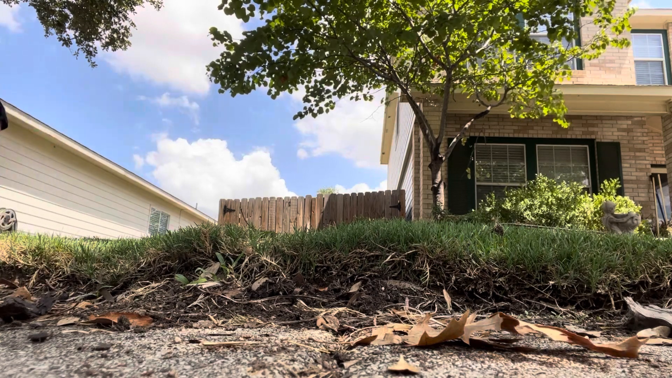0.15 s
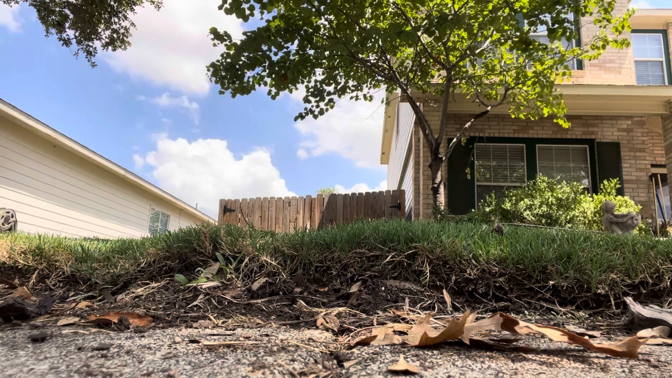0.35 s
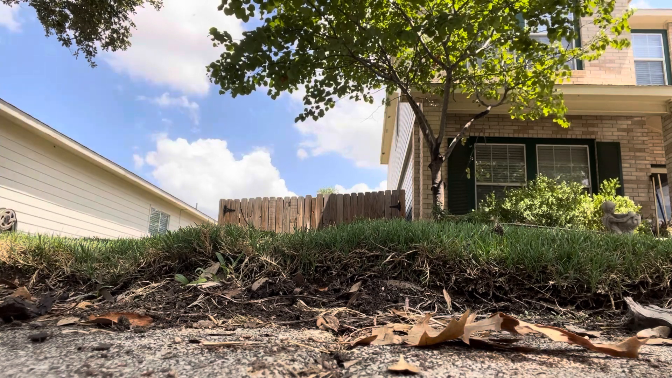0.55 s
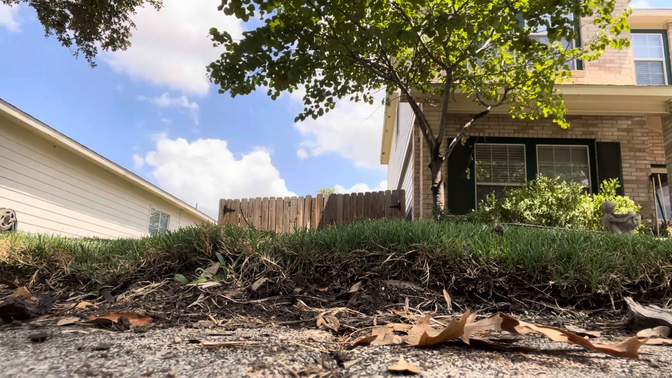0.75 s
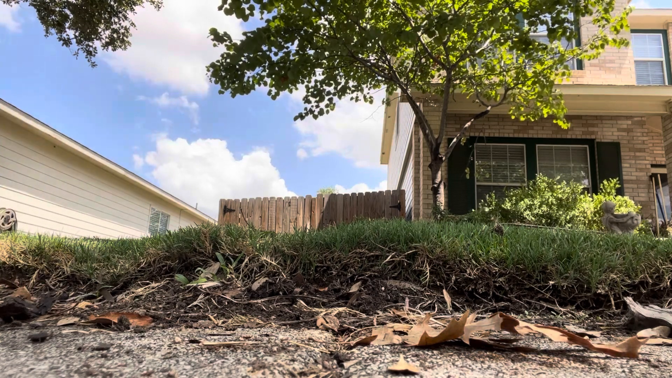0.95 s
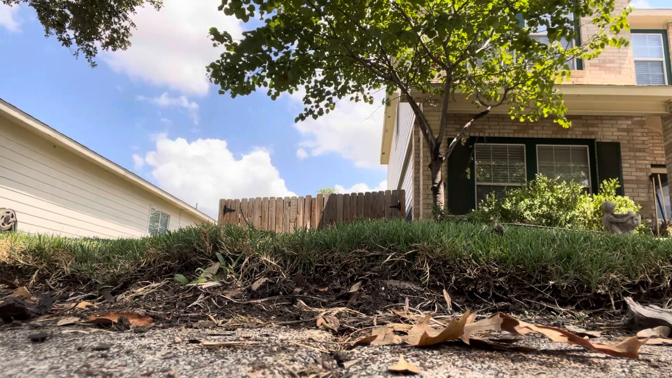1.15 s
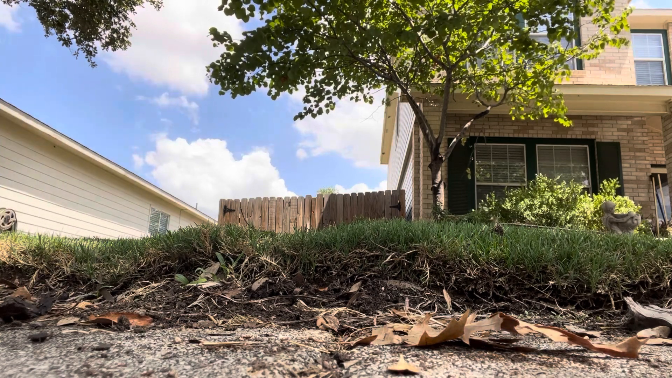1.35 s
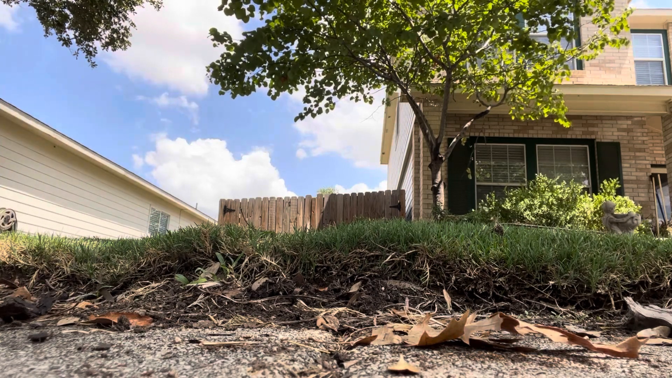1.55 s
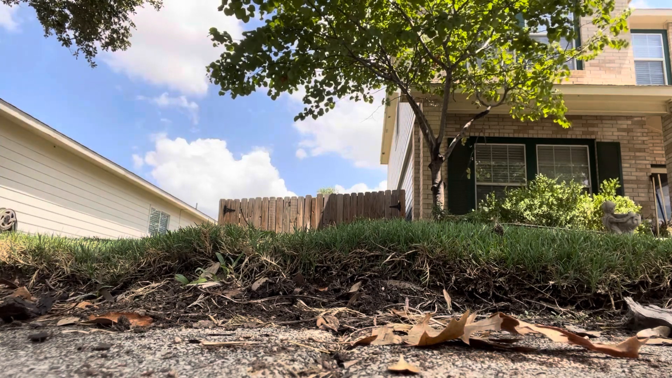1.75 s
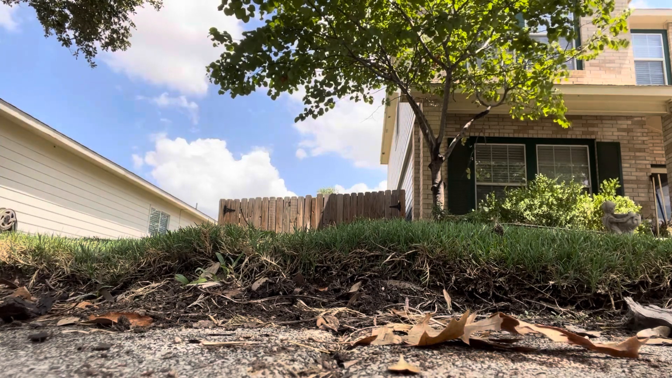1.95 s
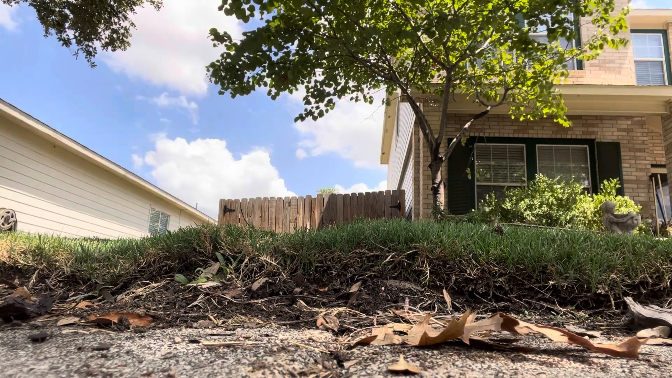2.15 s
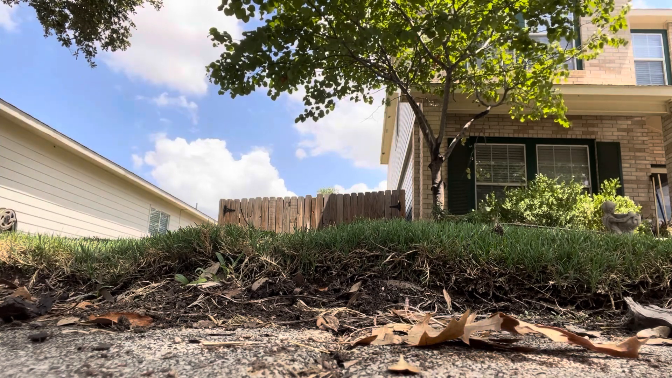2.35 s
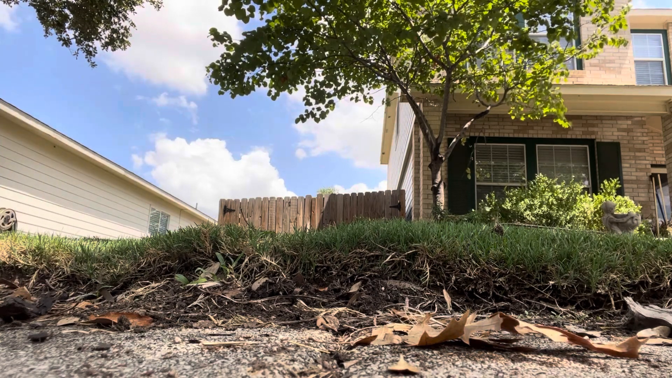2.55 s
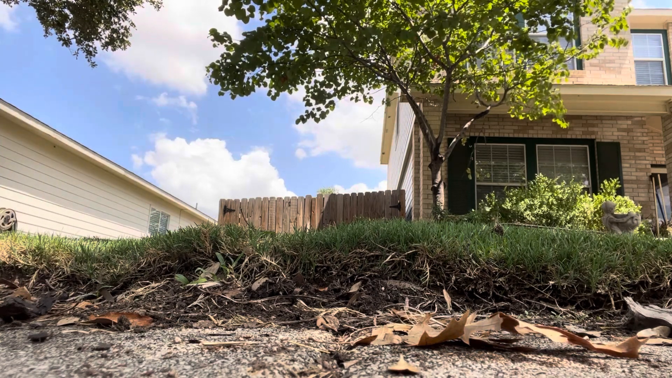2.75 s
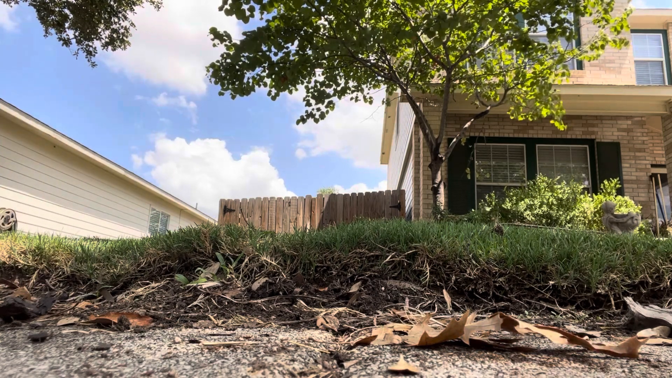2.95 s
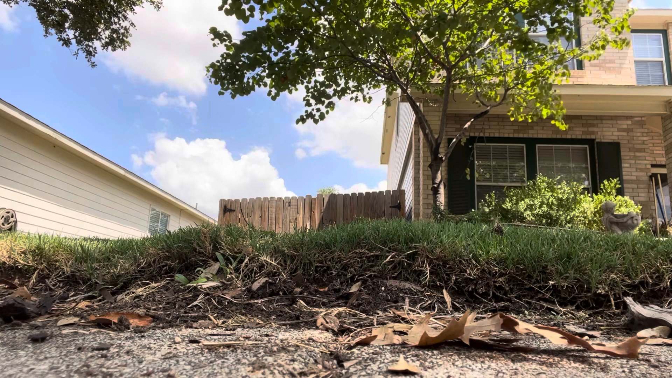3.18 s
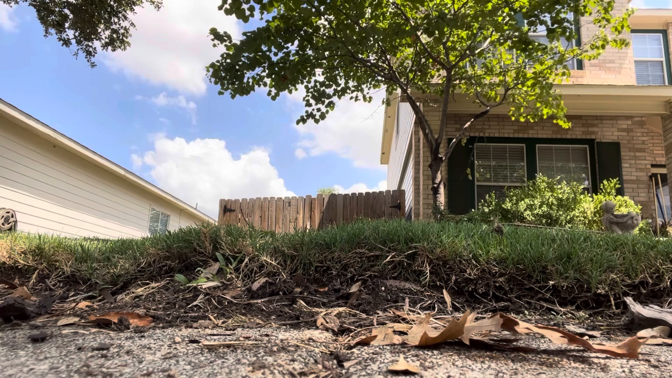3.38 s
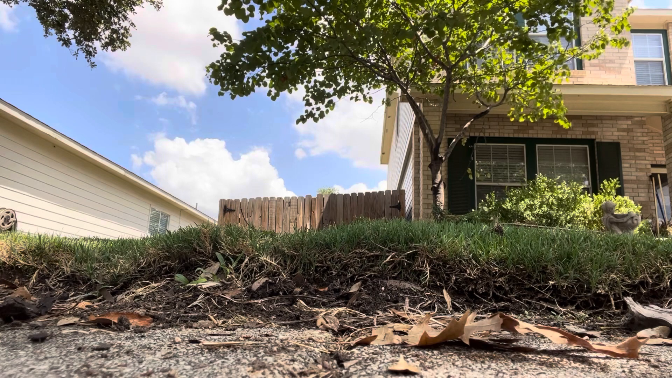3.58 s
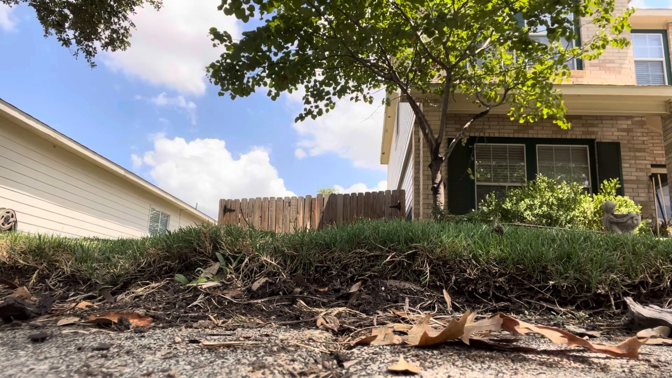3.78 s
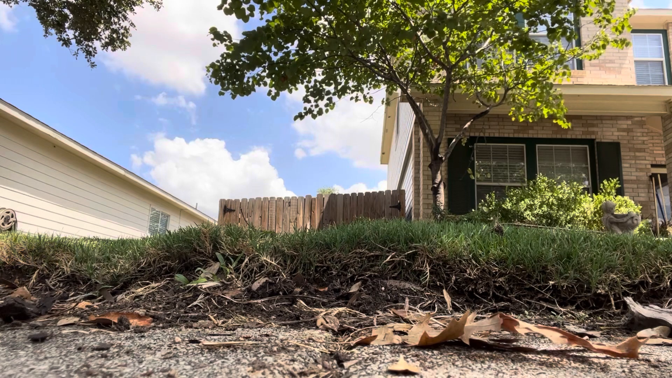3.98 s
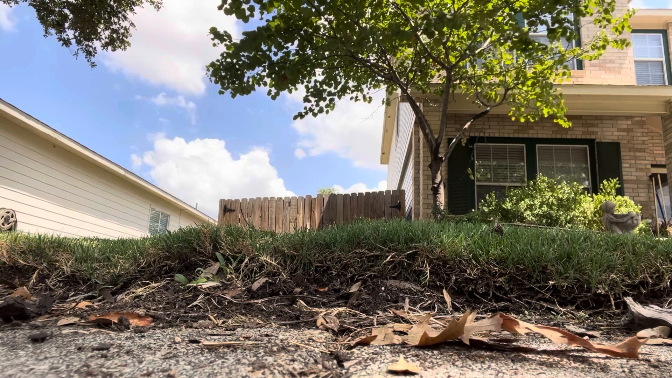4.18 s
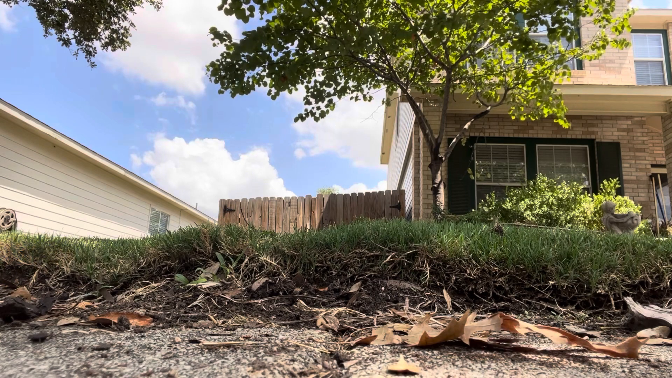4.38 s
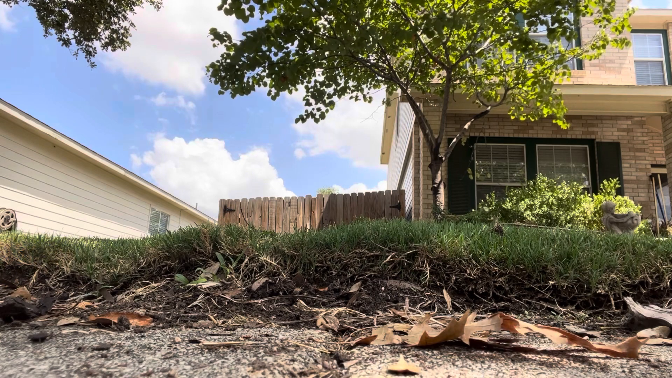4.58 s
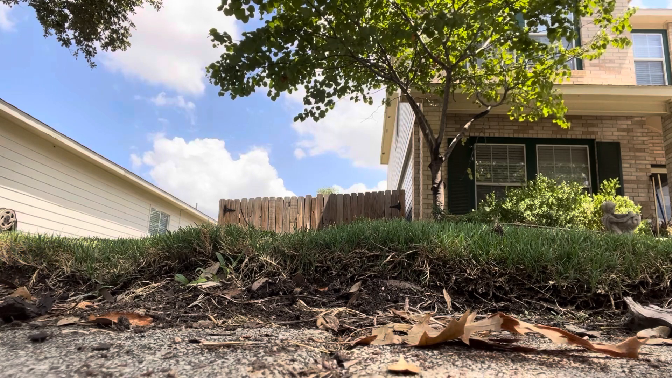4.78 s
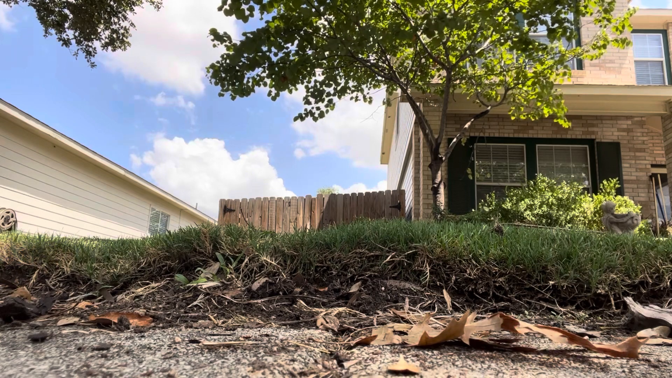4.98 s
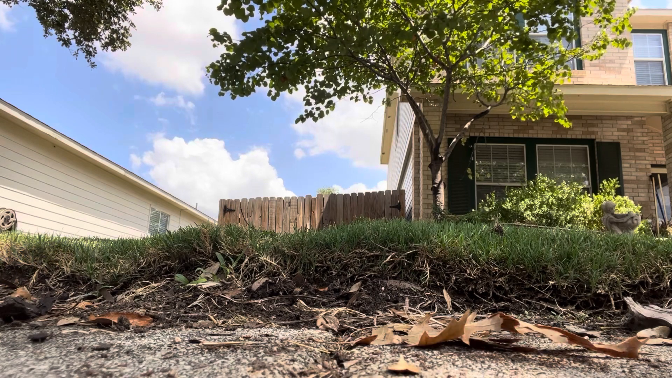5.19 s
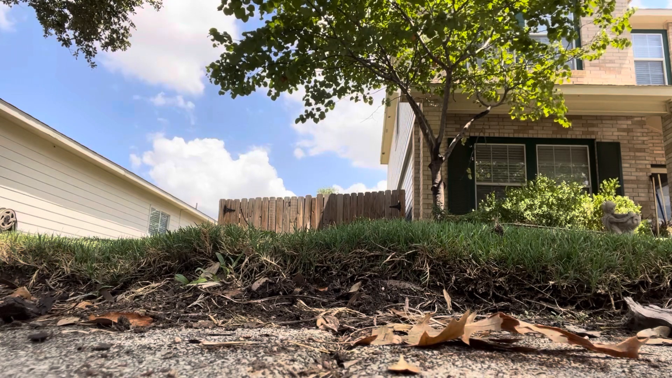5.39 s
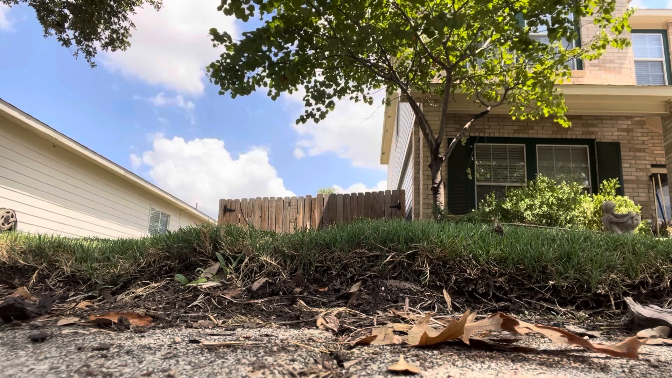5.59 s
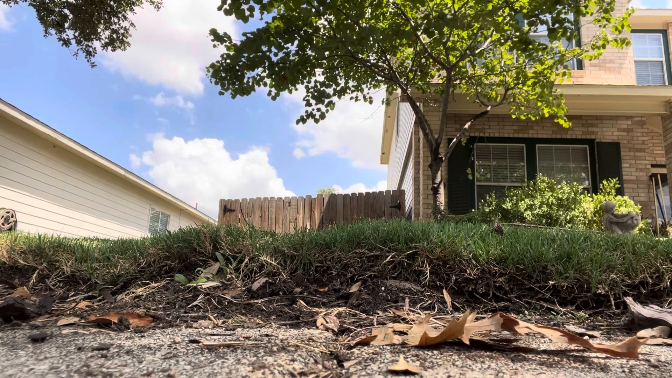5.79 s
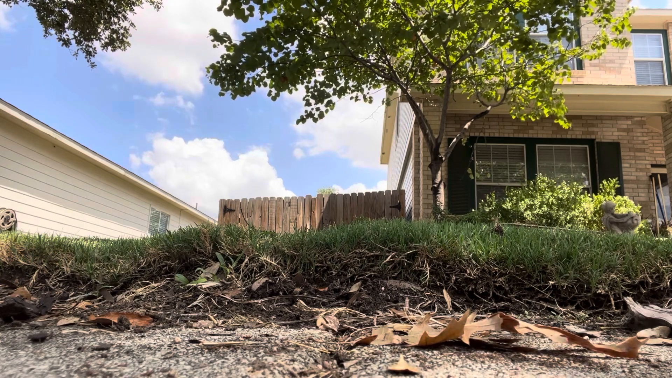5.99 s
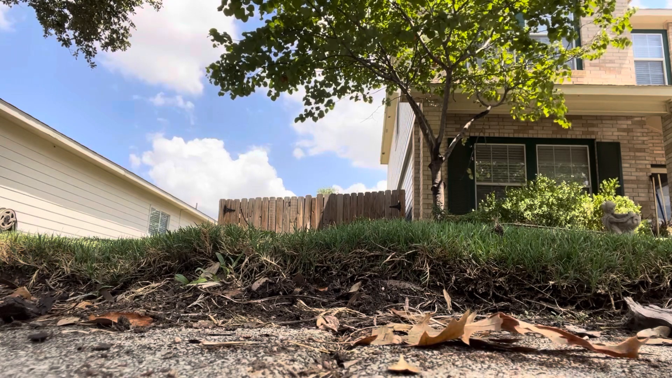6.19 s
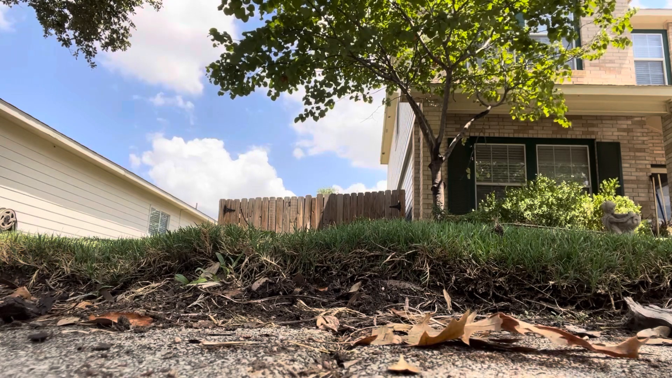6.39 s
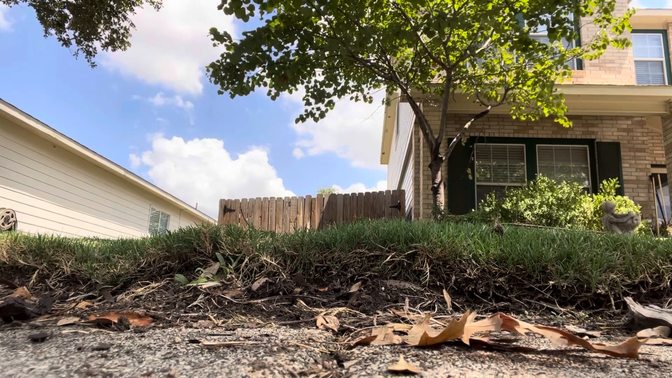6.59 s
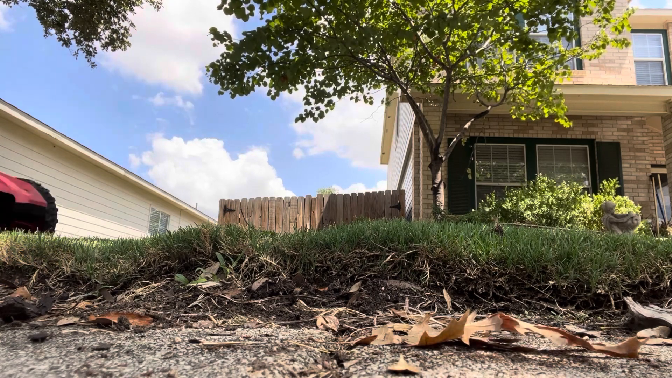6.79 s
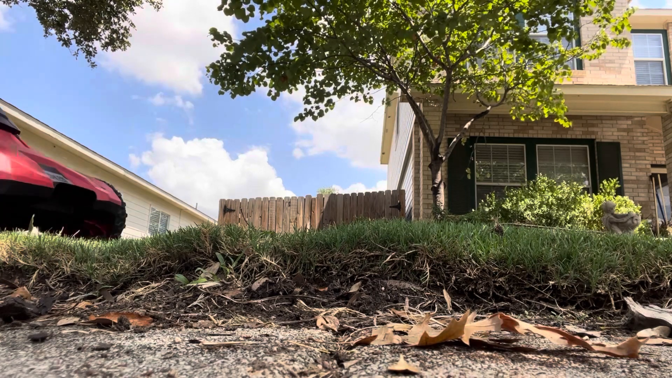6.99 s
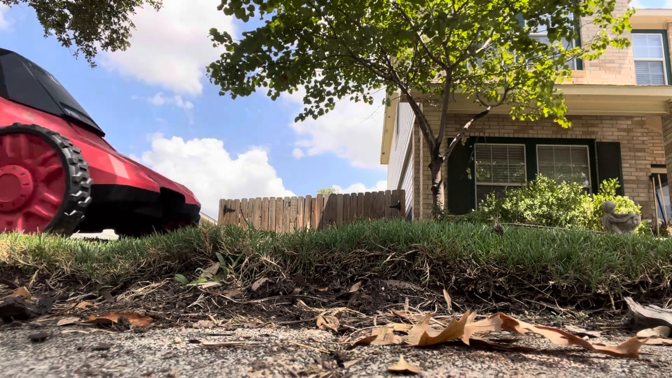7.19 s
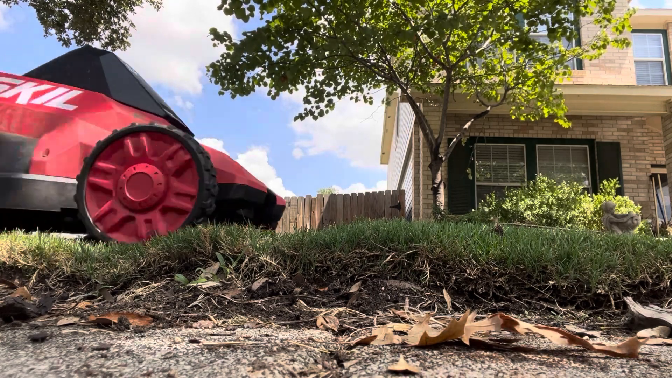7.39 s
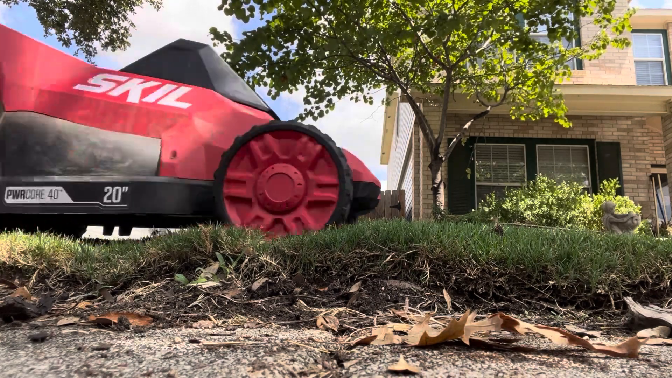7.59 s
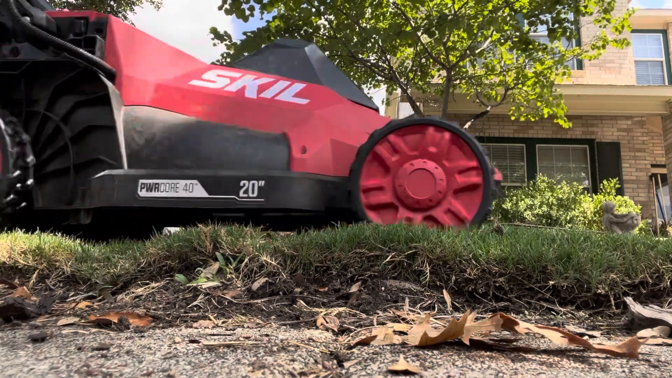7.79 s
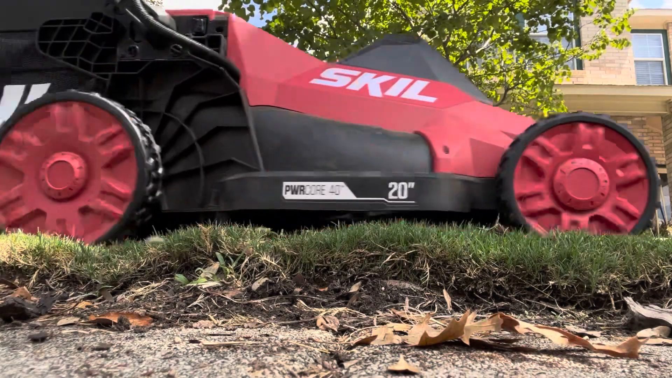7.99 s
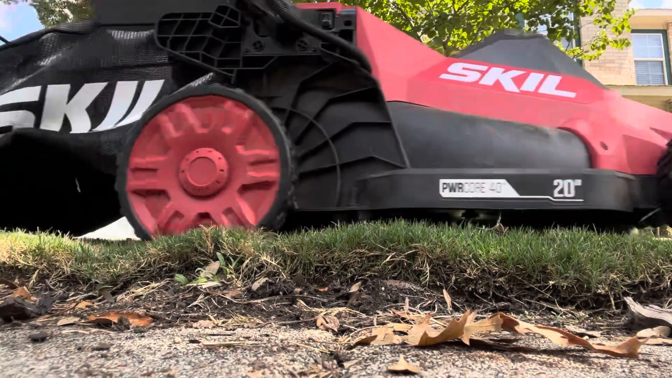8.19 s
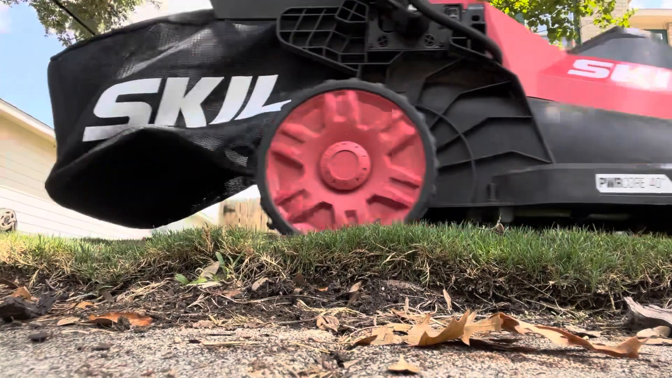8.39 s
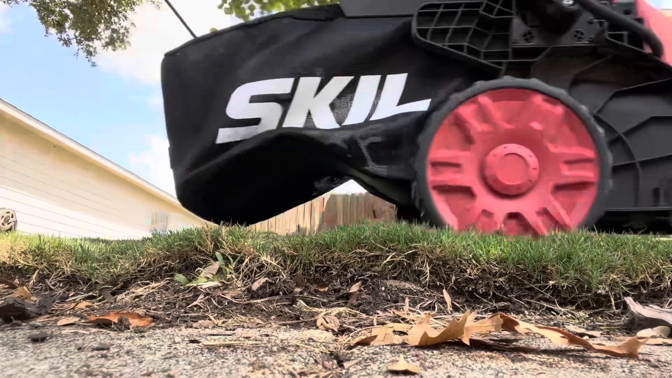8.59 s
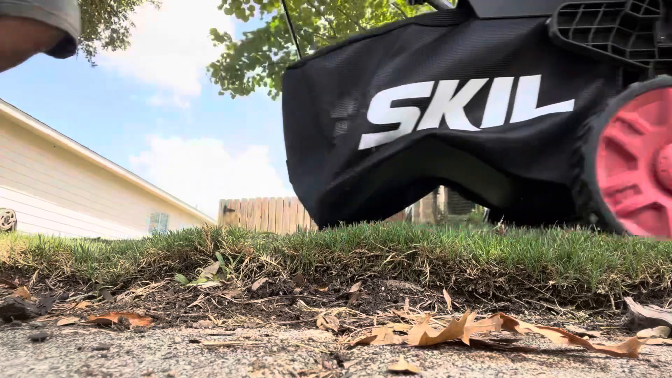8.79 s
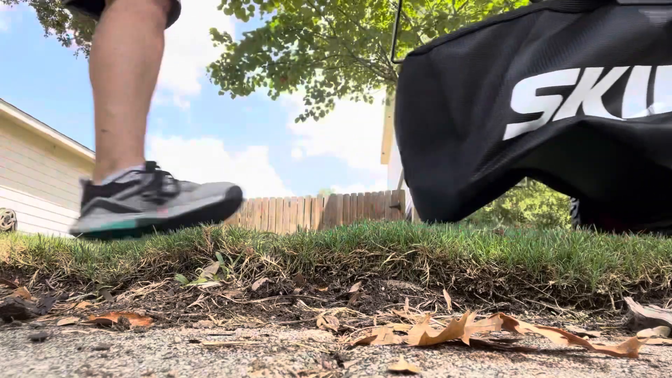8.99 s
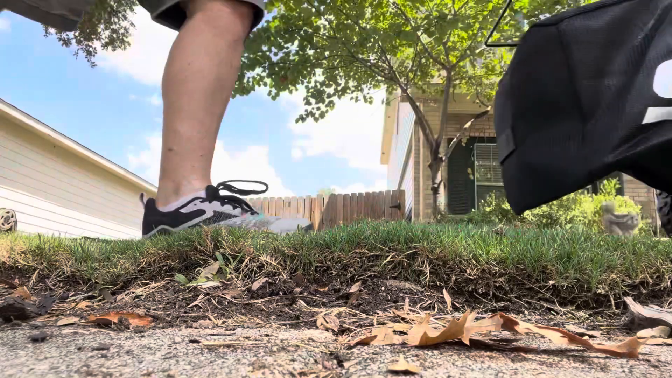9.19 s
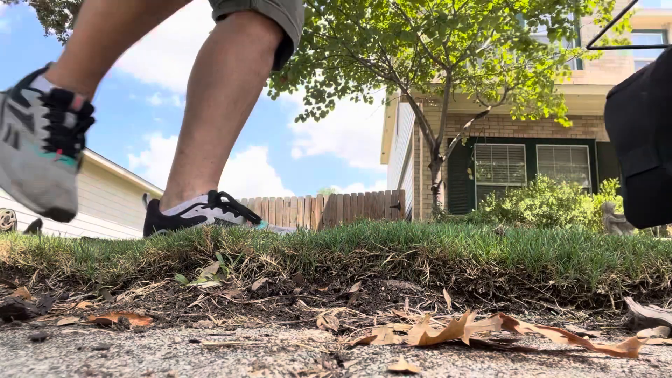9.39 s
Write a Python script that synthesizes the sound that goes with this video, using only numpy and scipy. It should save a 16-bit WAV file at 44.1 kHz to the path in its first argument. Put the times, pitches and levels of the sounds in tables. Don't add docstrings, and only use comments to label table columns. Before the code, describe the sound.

Outdoors on a lawn, a cordless mower hums and roars steadily off to the left, its air chopped by the blade. Debris ticks, and as it tips to turn, a bright hiss and rustle open up, then dull again. It rolls in, passes close with hard knocks and leaves to the right. The stereo microphone lies low among dry leaves.

```python
import sys
import numpy as np
from scipy import signal
from scipy.io import wavfile
from scipy.ndimage import uniform_filter1d

SR = 44100
rng = np.random.default_rng(int(sys.argv[2]) if len(sys.argv) > 2 else 0)


def dump(signal):
    limited = np.clip(np.atleast_2d(signal).T, -1, 1)
    pcm = np.round(limited * 32767).astype(np.int16)
    wavfile.write(sys.argv[1], SR, pcm)


def level_to_linear(level):
    exponent = np.asarray(level, float) / 20
    return 10 ** exponent


N = 416744
HOP = 256
T = np.arange(N) / SR
FRAMES = np.arange(N // HOP + 5) * HOP / SR
BINS = np.fft.rfftfreq(4 * HOP, 1 / SR)[:, None]

# [t/s, left port leads/ms, stretch of the roar's colour]
BEARING = [(0, .23, 0.81), (1.8, .32, 1.043), (5.6, .3, 1.06), (6.5, 0.23, 0.94), (7.3, 0.15, 0.98),
           (7.75, 0.012, 0.96), (8.3, -0.32, 1.05), (8.8, -.37, 1.15), (9.45, -0.44, 0.99)]
# [f/Hz, loss/dB, extra lag/rad]
SHADOW = [(80, .5, .2), (300, .5, .75), (600, 4.5, 1.2), (800, 8, 1), (1000, 12, .2), (1300, 4.5, -.35),
          (1750, 1.5, -.5), (2150, 5, 0), (2800, 1, -.2), (4000, 1, 0)]
# [t/s, strength 0-1, share of the rustle made at the deck 0-1]
BOUNCE = [(0, .3, 0), (1.6, .6, .1), (2, .85, .9), (3.2, .85, .9), (3.5, .7, .7), (6, .6, .4),
          (6.6, .3, .3), (9.45, .3, .3)]
# [t/s, level/dB from that across the lawn]
NEAR = [(0, -2), (1, 0), (1.9, 0), (2.3, 1), (3.1, 3), (3.4, .5), (4.1, 1.5), (4.5, -1), (5.2, 1.5),
        (5.8, 5.5), (6.05, 5), (6.4, 8.5), (7, 9.5), (7.85, 7), (8.3, 5.5), (8.65, 1.5), (9.45, -4)]
# [t/s, level/dB]
OPEN = [(0, -14.5), (1.6, -13.5), (1.95, -7), (2.3, -1), (2.75, 1), (3.05, -2.5), (3.25, -11.5), (4, -10.5),
        (4.6, -15), (5.1, -10), (6.05, -7), (6.4, 0.5), (6.85, -3.5), (7.3, -2), (7.9, -2.5), (8.4, -6),
        (8.85, -10.5), (9.45, -10.5)]
RUSTLE_DB = -42


def evened(x):
    return x / np.sqrt(np.mean(abs(x) ** 2) + 1e-20)


def read(points, hz):
    f, *values = np.transpose(points)
    return [np.interp(np.log(hz + 1), np.log(f + 1), v) for v in values]


def follow(rows, t):
    s, *values = np.transpose(rows)
    return [np.interp(t, s, v) for v in values]


def step(t, s, width_s):
    return .5 + .5 * np.tanh((t - s) / width_s)


def bump(t, s, half_s):
    return np.exp(-((t - s) / half_s) ** 2)


def place(t):
    # [left leads/ms, share on the right port, shift of its pitch]
    shade = [(-.4, -0.29, .66), (-.15, 0.48, 0.61), (.03, .6, 1.03), (.17, 1.14, 0.71), (.27, 0.82, 1.008)]
    lead_ms = follow(BEARING, t)[0]
    shadow, shift = follow(shade, lead_ms)
    likeness = 1 - .24 * bump(t, 7.9, .75)
    return lead_ms, shadow, likeness, shift


def air(colour_db, level_db, lead_ms, shadow, likeness, shift, patchy_db, flicker_db, bounce=0):
    # [f/Hz, likeness 0-1]
    alike = [(60, .96), (300, .97), (1500, .97), (2500, .88), (5000, .7), (9000, .7)]
    # [f/Hz, level/dB]
    port = [(1400, -0.5), (2600, -2.5), (3600, -3), (4600, 3), (6200, 1), (7100, -4), (8200, -1),
            (9500, -5)]
    # [delay/ms, share left 0-1, share right 0-1]
    echoes = [
        (.62, .15, 0),
        (.8, .15, .55),
        (1.57, .33, .15),
    ]
    a, b, c, d, patches = rng.standard_normal((len(level_db), len(BINS), 5)).T
    patches = uniform_filter1d(patches, size=10, axis=0)
    patches = evened(uniform_filter1d(patches, size=12, axis=1))
    flicker = evened(uniform_filter1d(rng.standard_normal(len(level_db)), size=3))

    loss_db, lag = read(SHADOW, BINS / shift)
    same = np.clip(read(alike, BINS)[0] * likeness, 0, 1)
    left = a + 1j * b
    right = same * left + np.sqrt(1 - same ** 2) * (c + 1j * d)
    late = 2 * np.pi * BINS * lead_ms / 1000 + lag * shadow
    right = right * level_to_linear(read(port, BINS)[0] - loss_db * shadow) * np.exp(-1j * late)
    ports = []
    for k, z in enumerate((left, right), 1):
        reflected = sum(e[k] * np.exp(-2j * np.pi * BINS * e[0] / 1000) for e in echoes)
        ports.append(z * (1 + bounce * reflected))

    colour = level_to_linear(colour_db) * np.ones_like(a)
    colour /= np.sqrt((colour ** 2).sum(0))
    size = colour * level_to_linear(level_db + patchy_db * patches + flicker_db * flicker)
    return signal.istft(np.array(ports) * size, nperseg=4 * HOP, noverlap=3 * HOP)[1][:, :N]


def tone(turns, hz, db):
    lead_ms, shadow = place(T)[:2]
    loss_db, lag = read(SHADOW, hz)
    late = 2 * np.pi * hz * lead_ms / 1000 + lag * shadow
    tilt = level_to_linear(loss_db * shadow / 2)
    left = tilt * np.sin(2 * np.pi * turns)
    right = np.sin(2 * np.pi * turns - late) / tilt
    return np.sqrt(2) * level_to_linear(db) * np.array([left, right])


def blade():
    # [t/s, f/Hz, hum level/dB]
    passes = [(0, 86.7, -41), (.2, 86.3, -34), (.9, 85.67, -28.5), (1.8, 85.85, -30.5), (2.3, 86.08, -33),
              (3, 87, -28), (3.4, 85.96, -39.5), (3.75, 85.5, -33), (4.75, 85.9, -31.5), (4.9, 86.7, -38),
              (5.5, 85.5, -30), (6.15, 86.47, -28.5), (6.45, 86.6, -23.5), (7.2, 86.16, -22.5),
              (7.7, 86.4, -18), (8.2, 86.33, -18.5), (8.92, 86.5, -42), (9.45, 85.65, -37.5)]
    hz, hum_db = follow(passes, T)
    return np.cumsum(hz) / SR, hum_db


def chopping(turns):
    depth = np.clip(.22 + .025 * follow(NEAR, T)[0], 0, 1)
    return depth * (np.cos(2 * np.pi * turns - 1.2) + 0.36 * np.cos(4 * np.pi * turns))


def blade_hum(turns, hum_db):
    upper = [-27.5, -35, -35]
    # [multiple, level/dB from the 4th]
    higher = [(5, -2), (6, -4.5), (7, -11.5), (8, -8.5)]
    # [t/s, half length/s, multiple, depth/dB]
    cancels = [(.5, 0.15, 2, -1.5), (3.105, 0.16, 2, -11), (4.537, 0.29, 2, -10.5), (5.355, 0.44, 2, -5.5),
               (7.23, .1, 2, -7), (8.208, .15, 2, -7.5), (8.608, 0.35, 2, -7), (9.4, .25, 2, -7.5),
               (.3, 0.19, 3, -10), (2.3, 0.2, 3, -21), (3.55, 0.34, 3, -24), (4.498, 0.44, 3, -19.5),
               (5.55, 0.24, 3, -22), (6.24, 0.15, 3, -11), (6.932, 0.1, 3, -15), (8.998, 0.56, 3, -8),
               (1.2, .55, 4, -18), (3.497, 0.4, 4, -4), (4.704, 0.4, 4, -5), (6.4, 0.44, 4, -8)]
    drift = rng.standard_normal((len(FRAMES), 4))
    drift_db = 1.4 * evened(uniform_filter1d(drift, size=14, axis=0)).T
    orders_db = [hum_db + .5 * np.interp(T, FRAMES, drift_db[0])]
    for k, far_db in enumerate(upper, 2):
        level_db = far_db + 0.51 * follow(NEAR, FRAMES)[0] + drift_db[k - 1]
        for s, half_s, multiple, deep_db in cancels:
            if round(multiple) == k:
                level_db = level_db + deep_db * bump(FRAMES, s, half_s)
        orders_db.append(np.interp(T, FRAMES, level_db))
    orders = list(enumerate(orders_db, 1)) + [(k, orders_db[3] + db) for k, db in higher]
    return sum(tone(k * turns + rng.random() * (k > 1), k * 86, db) for k, db in orders)


def wheel_drive():
    # [t/s, half length/s, level/dB]
    pulls = [
        (.2, 0.48, -40),
        (1, 0.44, -37),
        (3.004, 0.16, -38),
        (4.652, 0.57, -42),
        (5.862, 0.49, -31.5),
        (7.95, .2, -36),
    ]
    load = level_to_linear(-52.5) + sum(level_to_linear(db) * bump(FRAMES, s, half_s) for s, half_s, db in pulls)
    turns = np.cumsum(157.4 - 0.42 * T) / SR
    return tone(turns, 118, np.interp(T, FRAMES, 20 * np.log10(load)))


def motor_whine():
    tooth_hz, below_rustle_db = 5082, -11
    waver_hz = 3 * evened(uniform_filter1d(rng.standard_normal(N), size=4000))
    level_db = RUSTLE_DB + follow(OPEN, T)[0] + below_rustle_db
    return tone(np.cumsum(tooth_hz + waver_hz) / SR, tooth_hz, level_db)


def wash():
    # [f/Hz, level/dB]
    colour = [(20, -51.5), (40, -45), (60, -0.5), (130, 6.5), (300, 10), (450, 10), (650, 9), (900, -44.5)]
    level_db = -31.5 + 0.89 * follow(NEAR, FRAMES)[0] + 4.5
    return air(read(colour, BINS)[0], level_db, *place(FRAMES), patchy_db=1.33, flicker_db=1.45)


def roar(chop):
    # [f/Hz, level/dB]
    colour = [(300, -60), (500, -12.5), (700, -3), (950, 0), (1200, -3), (1500, -7.5), (1700, -17),
              (1950, -19), (2400, -29.5), (3000, -82.5)]
    stretch = follow(BEARING, FRAMES)[1]
    cavity_hz, cavity_oct, cavity_db = 940, 0.26, 1.5
    cavity = bump(np.log2((BINS + 1) / cavity_hz), 0, cavity_oct)
    colour_db = read(colour, BINS / stretch)[0] + cavity_db * cavity * bump(FRAMES, 7.46, 1.6) ** 2
    level_db = -22 + follow(NEAR, FRAMES)[0] + 1.5
    bounce = 0.028 * follow(BOUNCE, FRAMES)[0]
    noise = air(colour_db, level_db, *place(FRAMES), patchy_db=0.5, flicker_db=0.9, bounce=bounce)
    return noise * (1 + chop)


def rustle_levels():
    # [t/s, length/s, level/dB]
    scuff_rows = [(0.01, 0.053, -62), (.25, .05, -63), (0.497, 0.067, -61), (0.587, 0.057, -57),
                  (.95, 0.1, -52), (1.238, .07, -49.5), (1.386, .09, -47.5), (1.542, 0.075, -47.5),
                  (1.678, 0.045, -53), (1.896, 0.045, -45), (2.085, 0.064, -40.5), (4.103, 0.089, -51),
                  (4.196, 0.05, -50), (4.49, .05, -55), (5.6, .12, -48.5), (6.12, .06, -58),
                  (6.396, 0.064, -45), (7.75, .1, -50), (8.441, .06, -53)]
    open_db, far = follow(OPEN, FRAMES)[0], follow(BOUNCE, FRAMES)[1]
    scuffs = 0
    for s, length_s, db in scuff_rows:
        fade = np.exp(-np.maximum(FRAMES - s, 0) / length_s)
        scuffs = scuffs + level_to_linear(2 * db) * step(FRAMES, s, 0.013) * fade
    rustle = level_to_linear(2 * (RUSTLE_DB + open_db)) + scuffs
    grit = level_to_linear(2 * (-52.5 + 0.62 * open_db)) + level_to_linear(2 * 0.5) * scuffs * (1 - far)
    return 10 * np.log10(rustle), 10 * np.log10(grit)


def leaves():
    # [f/Hz, level/dB]
    rustle_colour = [(1500, -16.5), (3000, -7), (5000, -7.5), (8000, -8), (10000, -19), (12000, -29.5),
                     (15000, -40)]
    # [f/Hz, level/dB]
    grit_colour = [(6000, -17), (9000, 0), (12000, -3), (14000, -6.5), (16000, -4.5), (18000, -20.5)]
    bounce, far = follow(BOUNCE, FRAMES)
    chute_hz, chute_oct, chute_db = 4630, 0.3, 3.5
    chute = bump(np.log2((BINS + 1) / chute_hz), 0, chute_oct) * bump(FRAMES, 7, .7)
    colour_db = read(rustle_colour, BINS)[0] + chute_db * chute
    rustle_db, grit_db = rustle_levels()
    far_db, close_db = 10 * np.log10(far + 1e-6), 10 * np.log10(1 - far)
    bed = air(colour_db, rustle_db + 9 + close_db, .045, .2, .8, 1, patchy_db=1.2, flicker_db=1.2)
    bed += air(colour_db, rustle_db + 9 + far_db, *place(FRAMES),
               patchy_db=1.9, flicker_db=1.04, bounce=bounce)
    bed += air(read(grit_colour, BINS)[0], grit_db + 9, .045, .1, .5, 1,
               patchy_db=1.5, flicker_db=1.2, bounce=.6 * far)
    grains = level_to_linear(2.7 * np.minimum(rng.exponential(1, N), 4)) * (rng.random(N) < 120 / SR)
    crackle = signal.oaconvolve(grains, np.exp(-np.arange(400) / 60))[:N]
    return bed * evened(1 + 0.4 * crackle)


def debris():
    # [t/s, peak level/dB, low part/dB relative, left over right/dB]
    small = [(1.2399, -37, -1, -1), (1.4446, -34, -15, 5), (1.5668, -35, -12, 0.5), (1.6819, -43, -10, -2),
             (1.8813, -41, -6, -5), (1.9157, -34, -9, -5), (2.0857, -31, -12, 1.0), (2.2742, -33, -9, -1),
             (2.368, -42, -13.5, -1), (2.9018, -37, -16, 3), (5.0704, -41, -2, 12), (5.4736, -42, -3, 1.0),
             (5.6171, -42.5, -11, -1.5), (6.2253, -31, -3, -3), (6.3754, -54, -7, -1.5),
             (6.7665, -36.5, -2, -1.5), (6.9974, -39, -4, -2), (7.2273, -30, -4, -2),
             (7.2853, -37.5, -9, -1.5), (7.3713, -33, -7, 0.5), (7.4368, -35, -9, 1.5),
             (7.7438, -29, -12, 2.5), (8.1874, -33, -8, 7), (8.4462, -26, -18, 0), (8.8594, -43, -13, -5),
             (9.1184, -40.5, -7, 8)]
    # [t/s, peak level/dB, low part/dB relative, left over right/dB]
    knocks = [
        (6.2962, -26, 4, 0),
        (6.405, -27, 2, 2),
        (7.5815, -19, 4, -3),
        (8.3728, -20, 1, 3),
    ]
    out, t, hits = np.zeros((2, N + 2000)), np.arange(1300) / SR, small + knocks
    shape = np.minimum(t / .0002, 1) * (np.exp(-t / .0006) + .06 * np.exp(-t / .006))
    bright = signal.butter(2, [9000, 16500], "band", fs=SR, output="sos")
    dull = signal.butter(2, [4200, 8500], "band", fs=SR, output="sos")
    for s, db, low_db, pan_db in hits:
        noise = rng.standard_normal((2, len(t)))
        noise = np.array([noise[0], .2 * noise[0] + noise[1]]) * shape
        top, low = signal.sosfilt(bright, noise), signal.sosfilt(dull, noise)
        top /= abs(top).max(1, keepdims=True)
        low /= abs(low).max(1, keepdims=True)
        gain = 2 * level_to_linear(db + np.array([[pan_db / 2], [-pan_db / 2]]))
        start = round(s * SR)
        out[:, start:start + len(t)] += gain * (top + level_to_linear(low_db) * low)
    return out[:, :N]


def hiss(chop):
    # [f/Hz, level/dB]
    colour = [(1300, -2.5), (1800, 13.5), (2600, 7), (3200, 4), (4500, -1.5), (6500, -47.5), (9000, -56.5),
              (12000, -28), (16000, -36)]
    turned, gone = step(FRAMES, 1.64, 0.28), step(FRAMES, 8.77, 0.28)
    level_db = -29.5 + 0.93 * follow(OPEN, FRAMES)[0] - 15.5 * (1 - turned) + 5 * gone
    level_db = level_db - 4.5 * bump(FRAMES, 7.1, 0.58)
    bounce = follow(BOUNCE, FRAMES)[0]
    wall_ms, wall_share = 1.926, 0.33
    reflected = wall_share * bounce * np.exp(-2j * np.pi * BINS * wall_ms / 1000)
    comb_db = 20 * np.log10(abs(1 + reflected) + .05)
    lead_ms, shadow, likeness, shift = place(FRAMES)
    likeness = likeness - .55 * gone
    noise = air(read(colour, BINS)[0] + comb_db, level_db + 1.5, lead_ms, shadow, likeness, shift,
                patchy_db=0.1, flicker_db=1.24, bounce=bounce)
    return noise * (1 + 0.21 * chop)


def scene():
    turns, hum_db = blade()
    chop = chopping(turns)
    tones = blade_hum(turns, hum_db) + wheel_drive() + motor_whine()
    mower = tones + wash() + roar(chop) + hiss(chop)
    return mower + (1 + 0.5 * chop) * leaves() + debris()


def thinned(mid, side):
    # [f/Hz, level/dB from the masking level]
    floor = [(8600, -60), (8900, -2), (9400, 5), (9700, 30), (12600, 30), (13700, -7), (15800, -5)]
    hz, _, z = signal.stft(np.array([mid, side]), SR, nperseg=8 * HOP, noverlap=6 * HOP)
    size = uniform_filter1d(uniform_filter1d(abs(z), size=5, axis=1), size=2, axis=2)
    top = size[1, (hz > 9300) & (hz < 12500)].mean(0)
    loud = size[:, (hz > 2000) & (hz < 9000)].mean((0, 1))
    masking = level_to_linear(-3.5) * np.sqrt(top * loud)
    z[0] *= size[0] > level_to_linear(read(floor, hz)[0])[:, None] * masking
    z[1] *= (size[1] > level_to_linear(-13.5) * loud) | (hz < 10000)[:, None]
    z = z * (hz < 15830)[:, None]
    return signal.istft(z, SR, nperseg=8 * HOP, noverlap=6 * HOP)[1][:, :N]


def band_limit(x):
    return signal.sosfilt(signal.butter(12, 16840, fs=SR, output="sos"), x)


def record(dry):
    sharp = [
        2.0857,
        2.2742,
        2.368,
        2.9018,
        6.2966,
        6.405,
        7.2833,
        7.4388,
        7.582,
        8.3732,
    ]
    left, right = 1.2 * np.tanh(dry / 1.2)
    pair = np.array([left + right, left - right]) / 2
    whole = sum(np.clip(2 - abs(T - s) / .002, 0, 1) for s in sharp)
    mid, side = whole * pair + (1 - whole) * thinned(*(pair * (1 - whole)))
    return band_limit(np.array([mid + side, mid - side]))


dry = scene()
out = record(dry)
dump(out)
```